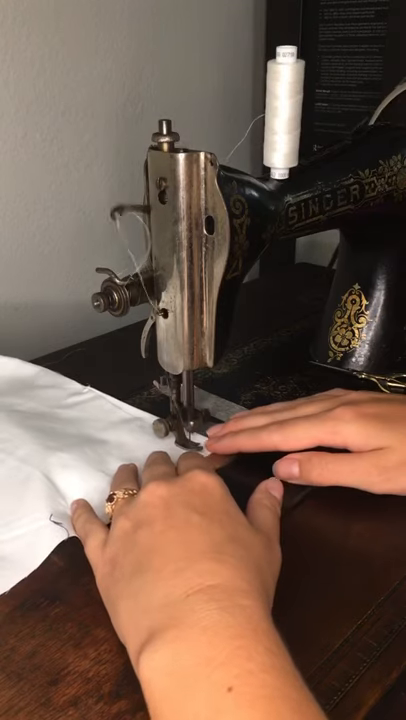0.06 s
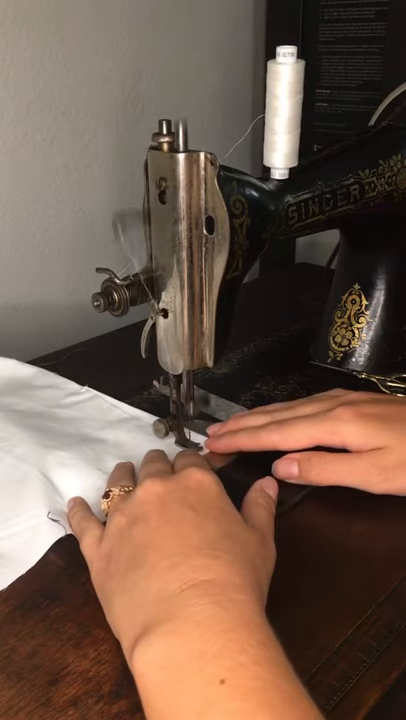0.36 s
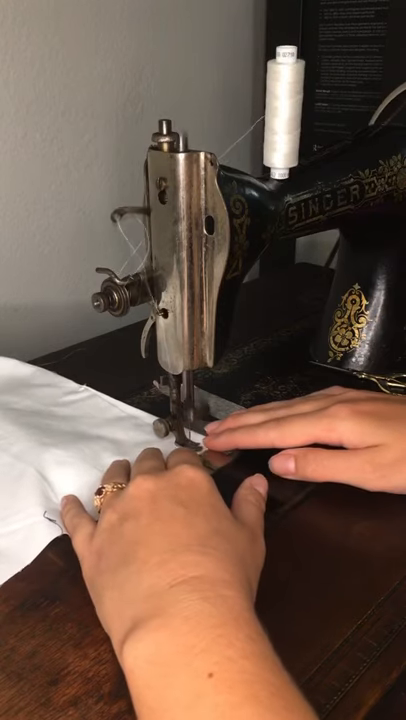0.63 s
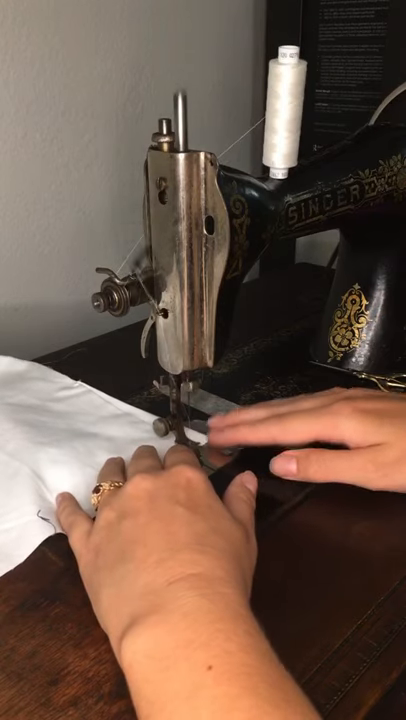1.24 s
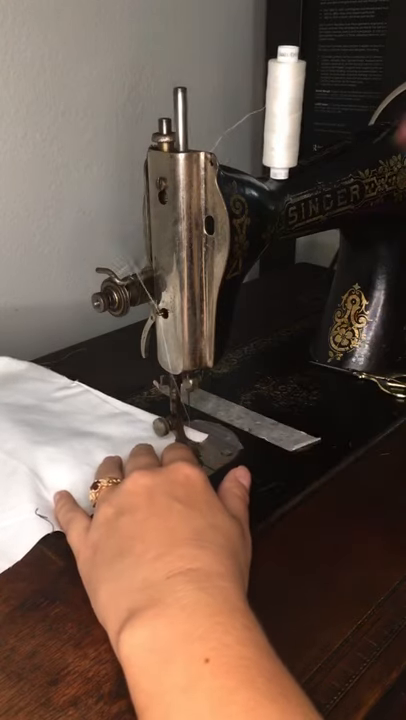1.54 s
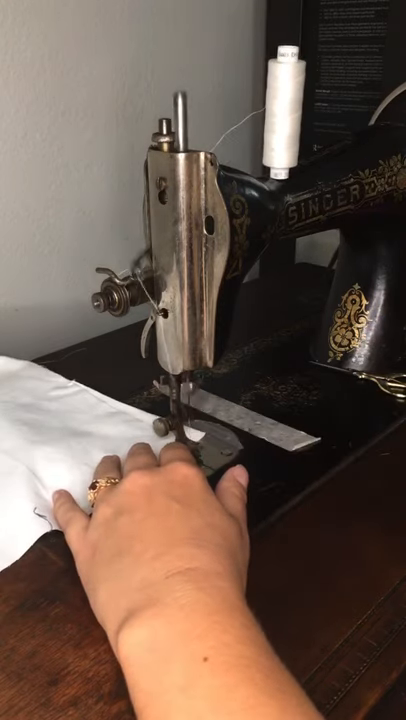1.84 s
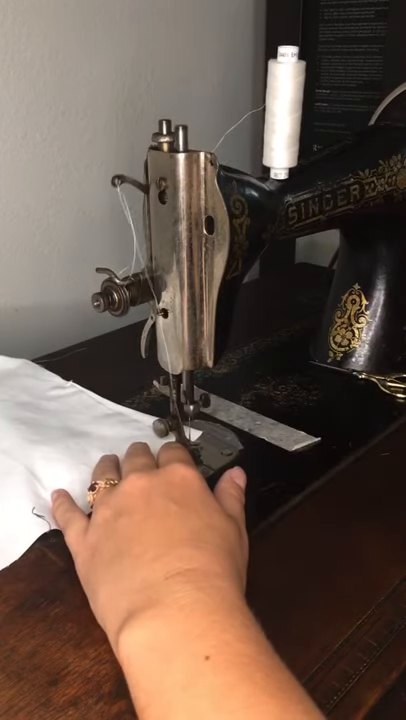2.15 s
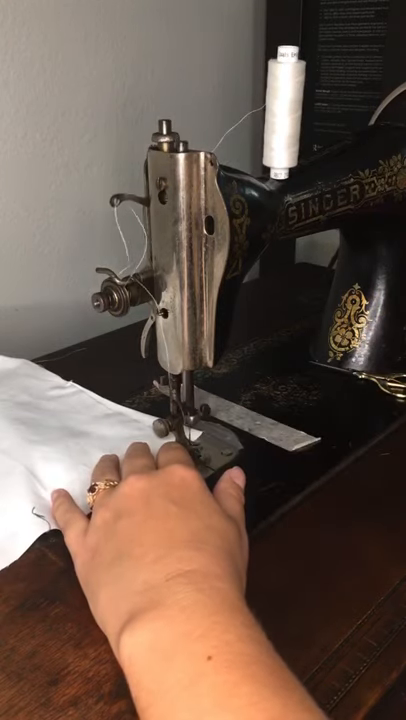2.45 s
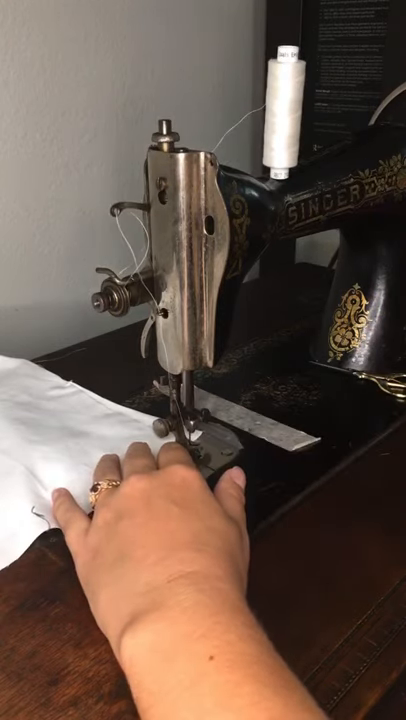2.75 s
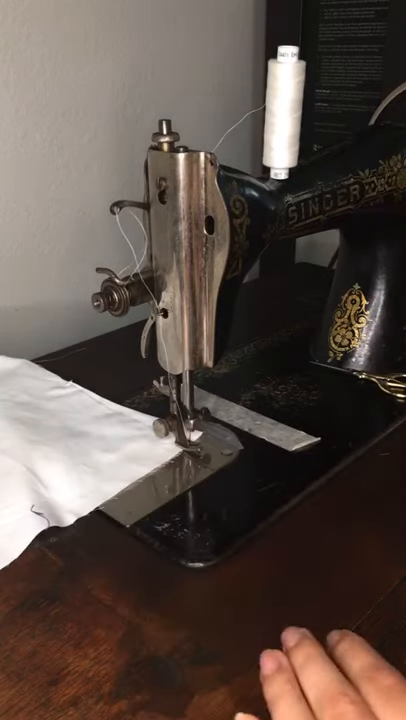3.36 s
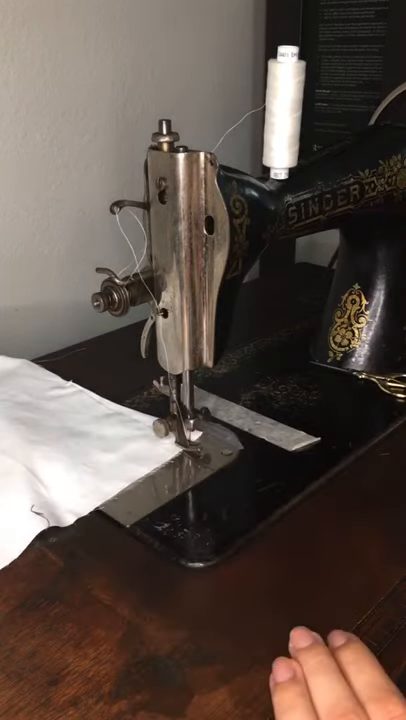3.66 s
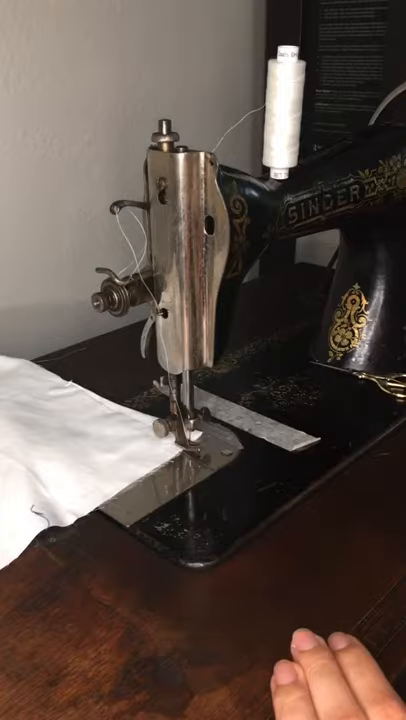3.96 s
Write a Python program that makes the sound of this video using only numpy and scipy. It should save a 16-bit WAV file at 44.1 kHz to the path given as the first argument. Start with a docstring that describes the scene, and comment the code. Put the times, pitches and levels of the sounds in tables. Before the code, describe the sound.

Rhythmic metal rattle of an old sewing machine stitching, ending in a clunk and faint clicks.

```python
"""The rattle and clack of an old cast-iron sewing machine, stitching about four times a second.
It stands on a wooden table in a small room, close to a single microphone. Each stitch is a bright
snap of the shuttle, knocks and ticks of the loose linkage and a thump in the table. After two seconds
it stops, the presser foot is lifted with a clunk, and a few light clicks follow over the room's low hum."""
import sys
import numpy as np
from scipy import signal
from scipy.fft import rfft, irfft
from scipy.io import wavfile

SR = 44100
rng = np.random.default_rng(int(sys.argv[2]) if len(sys.argv) > 2 else 0)


def master(y):
    """Save y as 16-bit WAV."""
    cut = np.clip(np.atleast_2d(y).T, -1, 1)
    pcm = np.round(cut * 32767)  # scale
    wavfile.write(sys.argv[1], SR, pcm.astype(np.int16))


N = 176400
T = np.arange(N) / SR
ROOM_T60_S, ROOM_BUILD_S = 0.36, 0.0035


def from_db(db):
    """Decibels to gain."""
    return 10 ** (np.asarray(db) / 20)


def unit_power(x):
    """Scale to an RMS of one."""
    return x / np.sqrt(np.mean(x ** 2) + 1e-20)


def softer(rows, by_db):
    """The same contacts at a lower level."""
    return [(s, db - by_db) for s, db in rows]


def body(x, colour, peaks=(), size=8192):
    """A resonating part: a causal filter of unit power with a broad colour and narrow peaks."""
    hz = np.maximum(np.fft.rfftfreq(size, 1 / SR), 1)
    points, levels = np.transpose(colour)
    db = np.interp(np.log(hz), np.log(points), levels)
    for centre, width, lift in peaks:
        db = db + lift / (1 + (2 * (hz - centre) / width) ** 2)
    cepstrum = irfft(np.log(from_db(db)))
    cepstrum[1:size // 2] *= 2   # fold to minimum phase
    cepstrum[size // 2 + 1:] = 0
    response = irfft(np.exp(rfft(cepstrum)))
    return signal.fftconvolve(x, response / np.linalg.norm(response))[:N]


def strikes(rows, attack_s, hold_s, t60_s):
    """Each contact (t/s, level/dB) chatters densely for a moment and dies away."""
    power = np.zeros(N)
    for s, db in rows:
        first = int(s * SR)
        age = T[:min(SR // 5, N - first)]
        decay = from_db(db - 60 * np.maximum(age - hold_s, 0) / t60_s)
        power[first:first + len(age)] += (np.minimum(age / attack_s, 1) * decay) ** 2
    return np.sqrt(power) * rng.choice([-1, 1], N)


def room(x, wet_db):
    """The energy of the contacts builds up between the near walls and dies away as a diffuse tail."""
    age = T[:SR // 2]
    decay = (from_db(-60 * age / ROOM_T60_S) * np.minimum(age / ROOM_BUILD_S, 1)) ** 2
    energy = np.maximum(signal.fftconvolve(x ** 2, decay / decay.sum())[:N], 0)
    return x + from_db(wet_db) * np.sqrt(energy) * rng.standard_normal(N)


def dense_ring(x, wet_db, t60_s, length_s):
    """Countless weak modes, of the casting or the room, add the same tail to every contact."""
    age = T[:int(length_s * SR)]
    tail = rng.standard_normal(len(age)) * from_db(-60 * age / t60_s)
    return x + from_db(wet_db) * signal.fftconvolve(x, tail / np.linalg.norm(tail))[:N]


# rattle of the running bearings: t/s, level/dB
RATTLE_LEVEL = [(0, -46.5), (.22, -49), (.8, -50.5), (1.3, -47.5), (1.44, -53.5), (1.6, -45.5), (1.73, -57),
                (1.82, -49), (1.96, -51.5), (2.1, -58), (2.5, -80)]
# its colour: f/Hz, level/dB
RATTLE_COLOUR = [(70, -5), (240, 8), (760, -3), (1200, 0.5), (3200, -4.5), (6500, -12.5), (16000, -20.5)]
# resonances of the casting and of the small steel parts: f/Hz, width/Hz, lift/dB
IRON_PEAKS = [(238.4, 21.4, 8.5), (477.2, 46, 11), (628.4, 87, 7.5), (868, 39, 10.5), (1167, 150, 5.5),
              (1478, 21, 5), (1812, 56, 5.5), (1953, 98, 6), (2520, 100, 5.5), (2986, 220, 5)]
STEEL_PEAKS = [(5700, 550, 10.5), (6860, 113, 12), (8380, 610, 7.6), (8870, 240, 7.8), (12080, 280, 4.5)]

def bearings(contacts_per_s=900, spread_db=3):
    """Many tiny contacts rattle through the casting while the wheel turns."""
    sizes = from_db(spread_db * np.minimum(rng.exponential(1, N), 4)) * rng.choice([-1, 1], N)
    grains = unit_power(sizes * (rng.random(N) < contacts_per_s / SR))
    level = from_db(np.interp(T, *np.transpose(RATTLE_LEVEL)))
    return body(room(grains * level, wet_db=-1.5), RATTLE_COLOUR, IRON_PEAKS + STEEL_PEAKS)


def waver(hz, width_hz):
    """A narrow band of noise, heard as a tone whose phase and level wander."""
    f = np.fft.rfftfreq(N, 1 / SR)
    spectrum = rfft(rng.standard_normal(N)) / (1 + (2 * (f - hz) / width_hz) ** 2)
    return unit_power(irfft(spectrum, N))


# colour of the air in the room: f/Hz, level/dB
AIR_COLOUR = [(15, -3.5), (28, 8.5), (45, 4.5), (62, -4.5), (80, -13), (130, -6), (160, -19.5), (240, -7.5),
              (400, -17), (800, -24.5), (5000, -38), (16000, -42)]
# low rumble: t/s, level/dB
RUMBLE_LEVEL = [(0, -50.5), (1.3, -51), (1.6, -43), (1.85, -59), (2.15, -47), (2.48, -53), (2.62, -46.5),
                (2.8, -53.5), (3.45, -48.5), (3.8, -60.5), (3.97, -47)]
# wavering hum: f/Hz, width/Hz, level/dB
HUM_BANDS = [(119.6, 12, -59.5), (182.3, 6.3, -66.5)]

def room_tone():
    """Hiss, rumble and hum all around the microphone."""
    air = from_db(-51) * body(rng.standard_normal(N), AIR_COLOUR)
    rumble = from_db(np.interp(T, *np.transpose(RUMBLE_LEVEL))) * waver(hz=51.6, width_hz=18)
    hum = sum(from_db(db) * waver(hz, width) for hz, width, db in HUM_BANDS)
    return air + rumble + hum


# blows in the mechanism: t/s, level/dB
LINKAGE_KNOCKS = [(.002, -39), (.132, -39.5), (0.158, -37), (0.176, -40.5), (0.233, -38), (0.511, -39.5),
                  (.574, -37.5), (0.659, -37.5), (0.799, -37.5), (1.068, -35.5), (1.121, -39.5),
                  (1.193, -39), (1.297, -41), (1.776, -41.5), (1.798, -38.5), (1.818, -41), (1.835, -57),
                  (1.889, -39), (1.94, -44), (2.004, -44)]
LINK_PINGS = [(.066, -34), (.22, -32.5), (.31, -37), (.482, -31), (.661, -35.5), (.861, -37.5),
              (1.037, -37.5), (1.129, -37), (1.298, -31.5), (1.386, -38), (1.567, -35.5)]   # one loose steel link
SHUTTLE_TICKS = [(0.131, -41), (0.179, -35), (0.431, -35.5), (.714, -38), (0.898, -38), (.988, -35.5),
                 (1.249, -34.5), (1.515, -38), (1.53, -43.5), (1.657, -36), (1.669, -37.5), (1.743, -43.5),
                 (2.017, -37), (2.033, -38.5)]   # the shuttle and its carrier
NEEDLE_BAR_CLANKS = [(.371, -37), (.466, -32.5), (0.7506, -31.5), (0.935, -35), (1.025, -33.5),
                     (1.329, -38.5), (1.4575, -35.5), (1.55, -32), (1.763, -38), (1.857, -37.5),
                     (2.142, -37)]   # at the end of its stroke
# colours of the casting, the steel parts and the machine's bed: f/Hz, level/dB
IRON_COLOUR = [(100, -43), (250, -7), (560, -14.5), (760, -11.5), (1150, 1.5), (3200, 0.5), (3700, -2.5),
               (4400, -5.5), (5000, -17), (8000, -15.5), (16000, -27)]
STEEL_COLOUR = [(1000, -23), (3500, 9.5), (4900, -9), (6300, 5), (7450, 1.5), (8200, -5.5), (9500, 2),
                (11500, 5.5), (14000, 4.5), (15800, 4.5)]
BED_COLOUR = [(130, -23), (330, -8), (620, 5), (800, -18), (2500, -34)]

def linkage():
    """Loose parts knock the casting and tick the steel; the low ring of the bed blooms after each knock."""
    heavy = LINKAGE_KNOCKS + NEEDLE_BAR_CLANKS
    on_iron = heavy + softer(LINK_PINGS, 5.5) + softer(SHUTTLE_TICKS, 4.5)
    on_steel = SHUTTLE_TICKS + softer(heavy, 6)
    knocks = room(strikes(on_iron, attack_s=0.00085, hold_s=0.0032, t60_s=0.039), wet_db=-3)
    ticks = room(strikes(on_steel, attack_s=0.0005, hold_s=0.0021, t60_s=0.033), wet_db=-5)
    bed = room(strikes(softer(on_iron, 13.5), attack_s=0.0087, hold_s=0.0087, t60_s=0.05), wet_db=-3)
    return (body(knocks, IRON_COLOUR, IRON_PEAKS) + body(ticks, STEEL_COLOUR, STEEL_PEAKS)
            + body(bed, BED_COLOUR, IRON_PEAKS))


# the shuttle snaps over, once a stitch: t/s, level/dB
SHUTTLE_SNAPS = [(0.0552, -27.5), (.3, -28.5), (0.5679, -28), (.852, -27), (1.119, -26), (1.3757, -29)]
# colour of the snap: f/Hz, level/dB
SNAP_COLOUR = [(200, -26), (1200, 2.5), (2200, -7), (3100, 2), (5000, -6.5), (6500, -6.5), (7500, -7),
               (8200, 1), (9500, 0), (10500, 2.5), (14000, 2.5), (15800, -4)]

def shuttle(take_up_s=0.0106):
    """The play in the shuttle closes with a tick; it snaps over, then slides on, steel on steel."""
    take_ups = [(s - take_up_s, db) for s, db in softer(SHUTTLE_SNAPS, 18)]
    snaps = strikes(SHUTTLE_SNAPS + take_ups, attack_s=0.00045, hold_s=0.003, t60_s=0.017)
    snaps = room(snaps, wet_db=-9)
    slides = strikes(softer(SHUTTLE_SNAPS, 16.5), attack_s=0.007, hold_s=0.017, t60_s=0.38)
    return body(snaps, SNAP_COLOUR, STEEL_PEAKS) + body(slides, STEEL_COLOUR, STEEL_PEAKS)


def rings(blows, modes, rise_s=0.0027, spread_db=3.5, detune=0.0039):
    """Each blow excites the modes of a steel part a little differently."""
    out = np.zeros(N)
    for s, db in blows:
        first = int(s * SR)
        age = T[:min(SR // 4, N - first)]
        for hz, mode_db, t60 in modes:
            peak_db = db + mode_db + spread_db * rng.normal()
            level = from_db(peak_db - 60 * np.maximum(age - rise_s, 0) / t60)
            phase = 2 * np.pi * (hz * rng.normal(1, detune) * age + rng.random())
            out[first:first + len(age)] += np.minimum(age / rise_s, 1) * level * np.sin(phase)
    return out


# modes of the steel parts: f/Hz, level/dB relative to the blow, t60/s
LINK_MODES = [(3168, 2.5, 0.031)]
SHUTTLE_MODES = [(5720, -8, 0.028)]
NEEDLE_BAR_MODES = [(1174, -9, 0.043), (1973, -7.5, 0.14), (2504, -4, 0.048), (2740, -18.5, 0.14)]
LAST_CLANK_MODES = [(2013, -12, 0.18), (2509, -5, .07)]   # rings on freely as the machine stops

def steel_pings():
    """Short pitched rings of link, shuttle and needle bar reach the microphone with the room's echo."""
    direct = rings(LINK_PINGS, LINK_MODES)
    direct += rings(SHUTTLE_TICKS + softer(SHUTTLE_SNAPS, 3), SHUTTLE_MODES)
    direct += rings(NEEDLE_BAR_CLANKS, NEEDLE_BAR_MODES)
    direct += rings(NEEDLE_BAR_CLANKS[-1:], LAST_CLANK_MODES)
    return dense_ring(direct, wet_db=-10, t60_s=ROOM_T60_S, length_s=0.5)


# thumps in the table, from the drive and from handling: t/s, level/dB
TABLE_THUMPS = [(0.111, -37.5), (0.189, -40.5), (.35, -38), (.645, -43), (.765, -44), (0.911, -35.5),
                (1.007, -40.5), (1.177, -41), (1.276, -37), (3.403, -48)]
# colour of a dull knock on its top: f/Hz, level/dB
WOOD_COLOUR = [(120, -7.5), (240, 4), (380, -4.5), (620, 4), (800, -20), (1200, -36)]

def table_top(hz=239.8, rise_s=0.016, t60_s=0.099):
    """Soft pushes swell and ring out in the low resonance of the wood and its octave."""
    tones = np.zeros(N)
    for s, db in TABLE_THUMPS:
        age = np.maximum(T - s, 0)
        swell = np.minimum(age / rise_s, 1) * from_db(db - 60 * np.maximum(age - rise_s, 0) / t60_s)
        phase = 2 * np.pi * hz * rng.normal(1, 0.021) * age
        tones += swell * (np.sin(phase) + from_db(-12) * np.sin(2 * phase))
    knocks = strikes(softer(TABLE_THUMPS, 12), rise_s, rise_s, t60_s)
    return tones + body(knocks, WOOD_COLOUR)


# groans of the drive: t/s, length/s, start f/Hz, end f/Hz, level/dB
DRIVE_GROANS = [(.28, 0.081, 620, 402, -58), (.335, 0.031, 377, 322, -43)]

def drive():
    """The drive rubs in short groans that slide down in pitch."""
    out = np.zeros(N)
    for s, length, start_hz, end_hz, db in DRIVE_GROANS:
        along = np.clip((T - s) / length, 0, 1)
        hz = start_hz + (end_hz - start_hz) * along
        out += from_db(db) * np.sin(np.pi * along) * np.sin(2 * np.pi * np.cumsum(hz) / SR)
    return out


# what the presser foot lever sets ringing: f/Hz, level/dB relative to ring_db, t60/s
CLUNK_MODES = [(245.6, 13, 0.13), (479, 9, 0.19), (622, 5.5, 0.26), (1300, -4, 0.41), (1459, -4, .15),
               (1770, -15, .2), (4380, -14, 0.34)]
# colour of its click: f/Hz, level/dB
LEVER_COLOUR = [(150, -10), (850, -6), (1150, -3), (1600, 0), (2300, -9), (4200, -12), (5200, -19.5),
                (16000, -33)]
# its resonances: f/Hz, width/Hz, lift/dB
LEVER_PEAKS = [(1110, 90, 5), (1460, 120, 4.5)]

def presser_foot(at_s=2.221, ring_db=-43.5, wood_db=-46.5, click_db=-31, rise_cycles=7):
    """The lever clicks, and the ring of the bed and the wooden table builds up behind it."""
    age = np.maximum(T - at_s, 0)
    ring = np.zeros(N)
    for hz, db, t60 in CLUNK_MODES:
        rise = np.minimum(age * hz / rise_cycles, 1) ** 2
        ring += rise * from_db(ring_db + db - 60 * age / t60) * np.sin(2 * np.pi * hz * age)
    wood = strikes([(at_s, wood_db)], attack_s=0.0088, hold_s=0.028, t60_s=0.32)
    click = room(strikes([(at_s, click_db)], attack_s=0.00035, hold_s=0.0023, t60_s=0.033), wet_db=-5.5)
    return ring + body(wood, WOOD_COLOUR) + body(click, LEVER_COLOUR, LEVER_PEAKS)


# light clicks of handling: t/s, knock level/dB, tick level/dB
HANDLING_CLICKS = [(2.835, -73, -62.5), (3.257, -73, -58.5), (3.423, -49, -45), (3.987, -43, -48.5)]
# colours of the knock and the tick: f/Hz, level/dB
LIGHT_KNOCK_COLOUR = [(250, -13), (650, -7.5), (1800, -1.5), (3100, -2), (15000, -40)]
LIGHT_TICK_COLOUR = [(1000, -21), (2800, -1), (5000, -5), (7000, 0.5), (12000, -3.5), (15500, -7)]
# resonances of the knock: f/Hz, width/Hz, lift/dB
LIGHT_KNOCK_PEAKS = [(1800, 84, 9), (3050, 130, -1)]

def handling():
    """Touches on the standing machine, each a small knock and a bright tick in the quiet room."""
    s, knock_db, tick_db = np.transpose(HANDLING_CLICKS)
    knocks = room(strikes(zip(s, knock_db), attack_s=0.0008, hold_s=0.0034, t60_s=0.088), wet_db=-3)
    ticks = room(strikes(zip(s, tick_db), attack_s=0.00036, hold_s=0.0026, t60_s=0.016), wet_db=-3)
    return body(knocks, LIGHT_KNOCK_COLOUR, LIGHT_KNOCK_PEAKS) + body(ticks, LIGHT_TICK_COLOUR)


def scene():
    """The machine and its room from beside the table, in mono."""
    contacts = shuttle() + linkage() + bearings() + handling()
    machine = dense_ring(contacts, wet_db=-8, t60_s=0.073, length_s=0.25)   # the whole casting rings
    return (machine + steel_pings() + drive() + table_top() + presser_foot() + room_tone())[None]


def record(dry):
    """The microphone's signal, cut steeply above 15.7 kHz."""
    return signal.sosfilt(signal.ellip(10, .1, 70, 15700, fs=SR, output="sos"), dry)


dry = scene()
out = record(dry)
master(out)
```